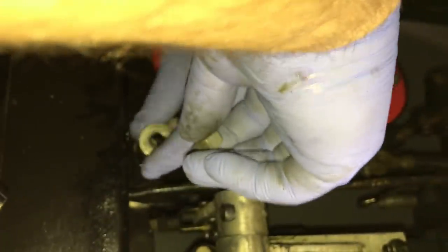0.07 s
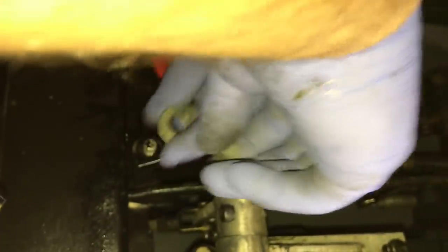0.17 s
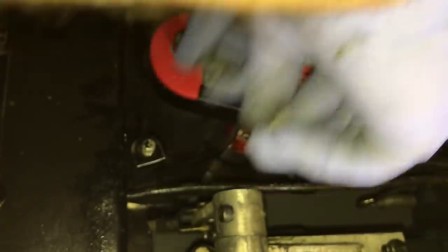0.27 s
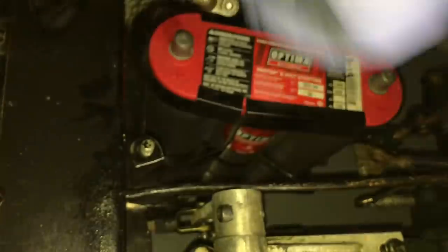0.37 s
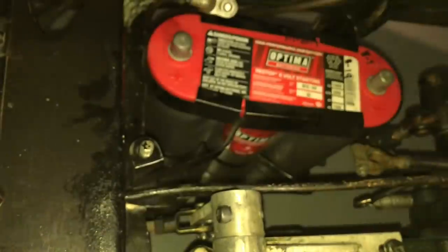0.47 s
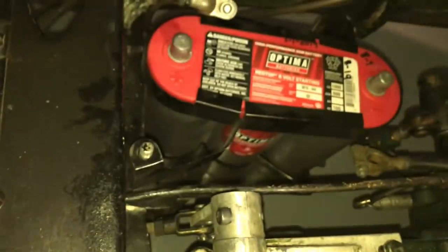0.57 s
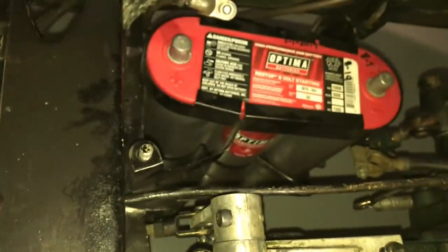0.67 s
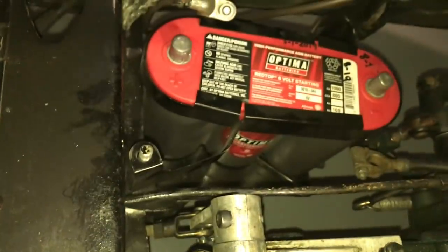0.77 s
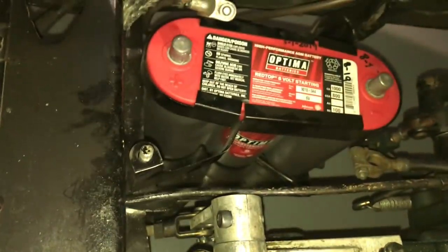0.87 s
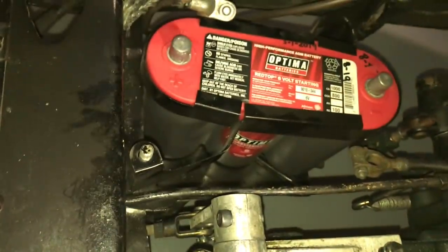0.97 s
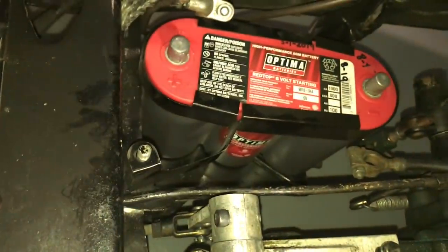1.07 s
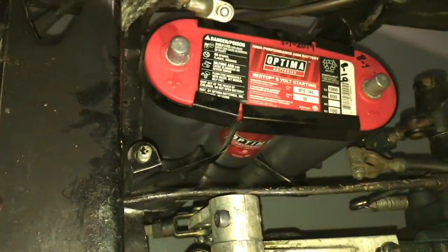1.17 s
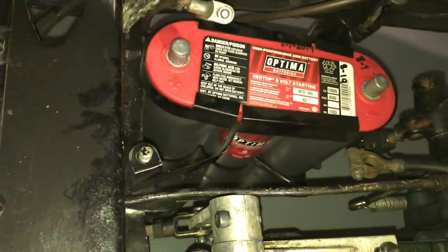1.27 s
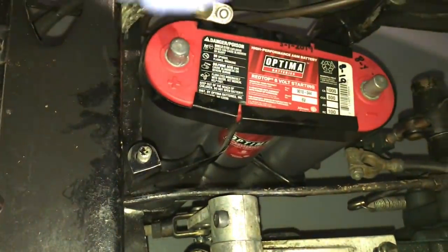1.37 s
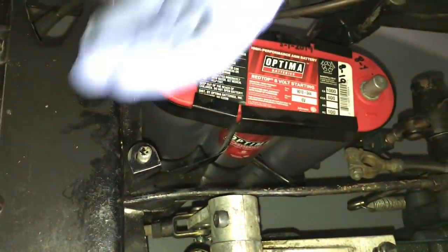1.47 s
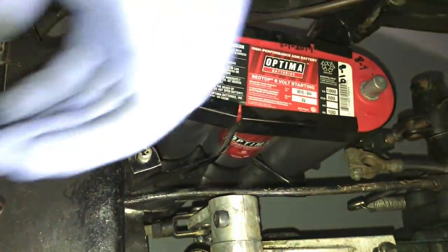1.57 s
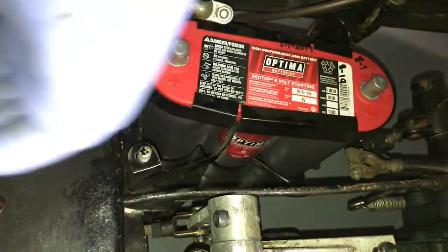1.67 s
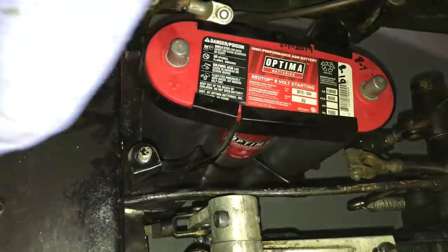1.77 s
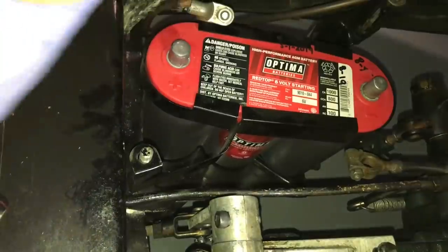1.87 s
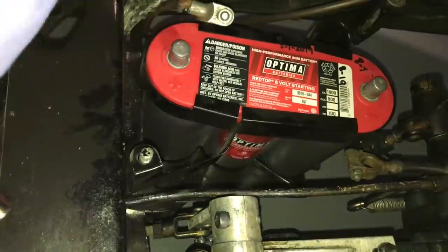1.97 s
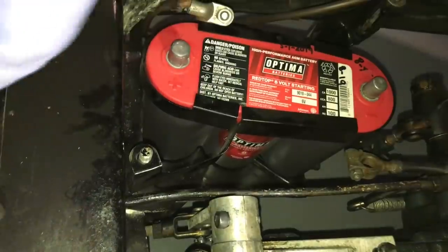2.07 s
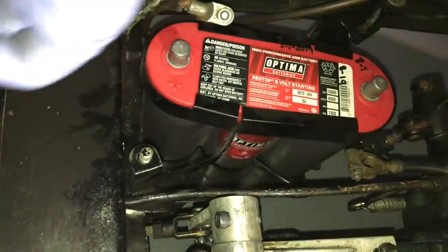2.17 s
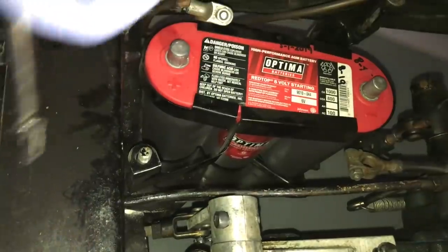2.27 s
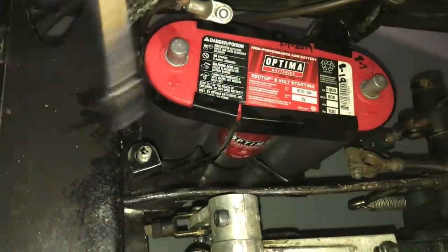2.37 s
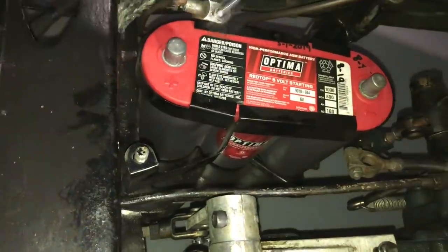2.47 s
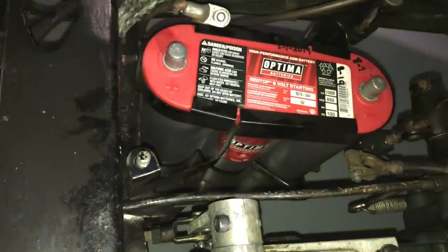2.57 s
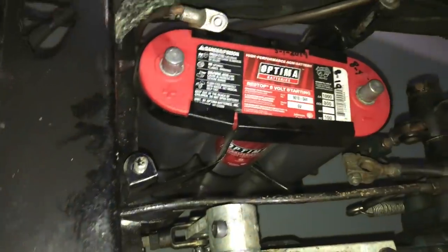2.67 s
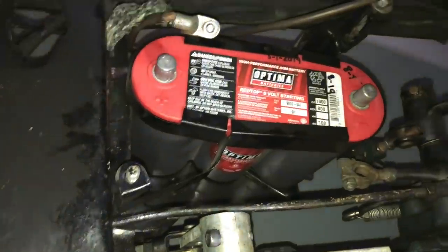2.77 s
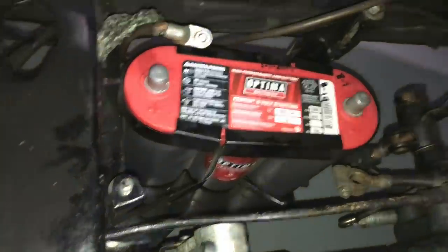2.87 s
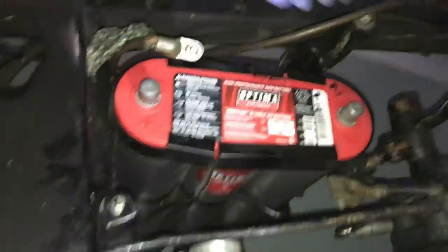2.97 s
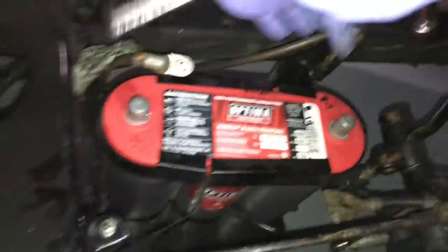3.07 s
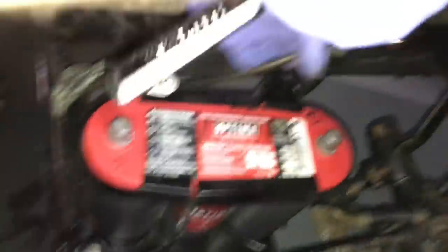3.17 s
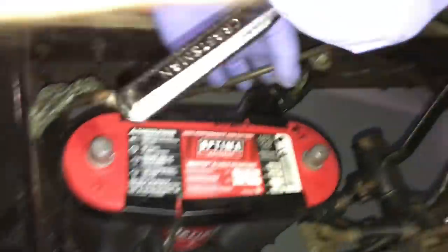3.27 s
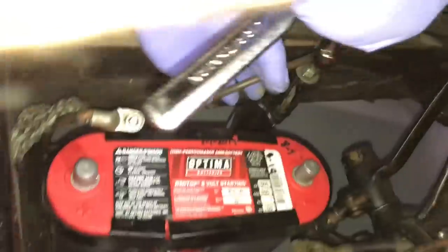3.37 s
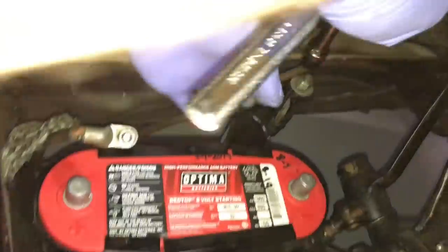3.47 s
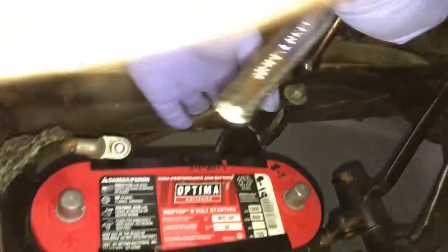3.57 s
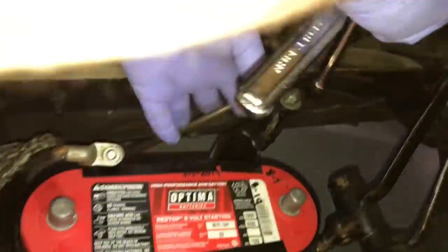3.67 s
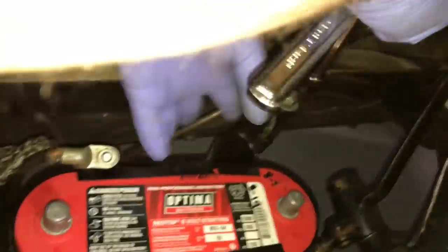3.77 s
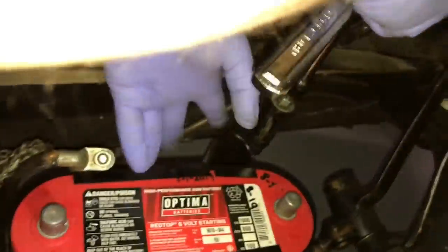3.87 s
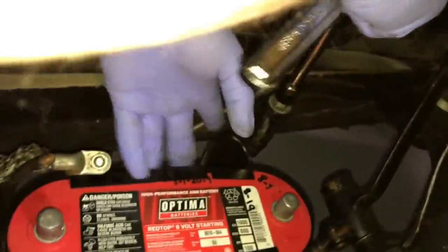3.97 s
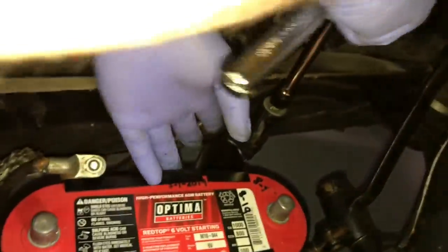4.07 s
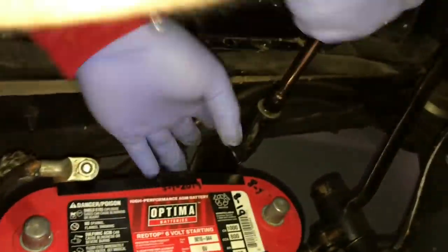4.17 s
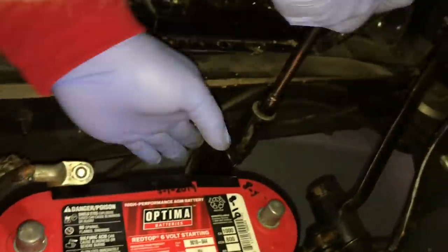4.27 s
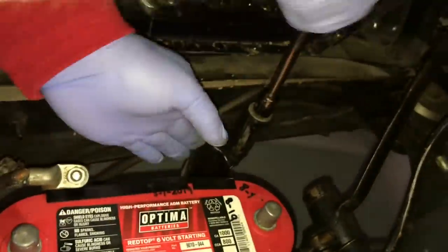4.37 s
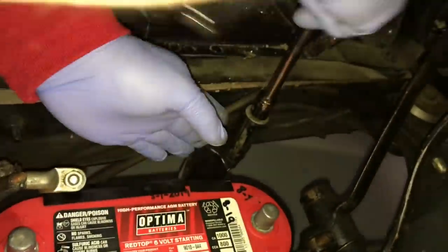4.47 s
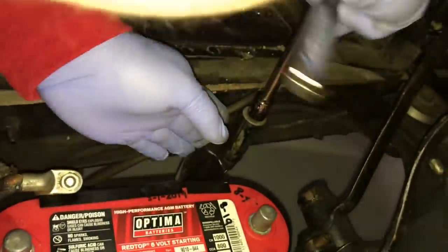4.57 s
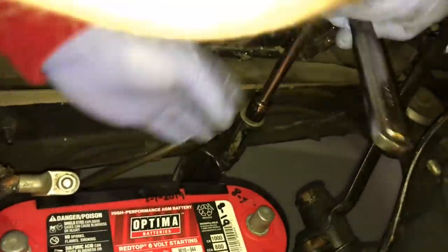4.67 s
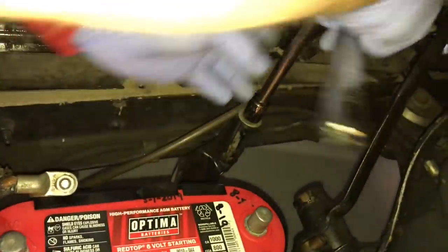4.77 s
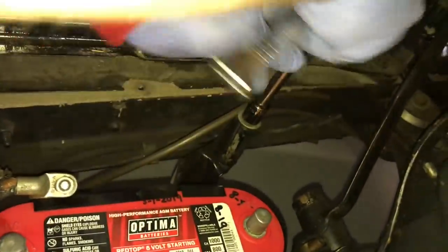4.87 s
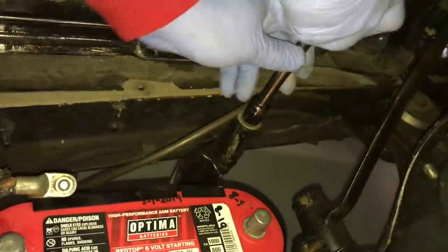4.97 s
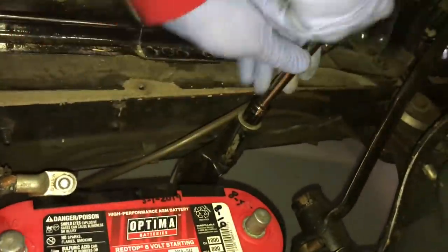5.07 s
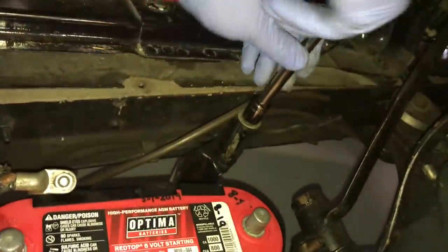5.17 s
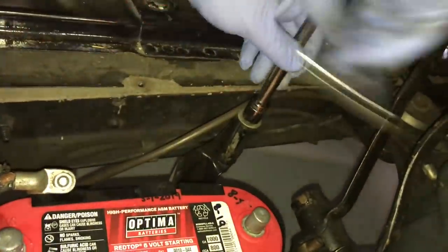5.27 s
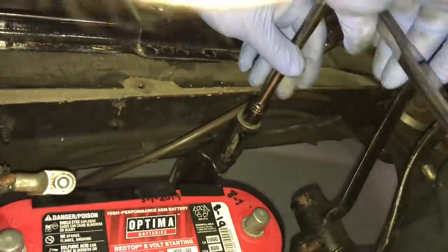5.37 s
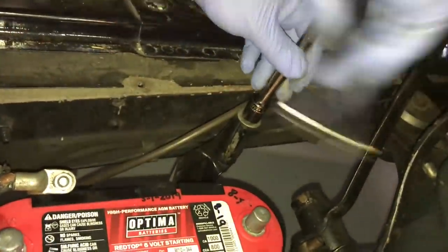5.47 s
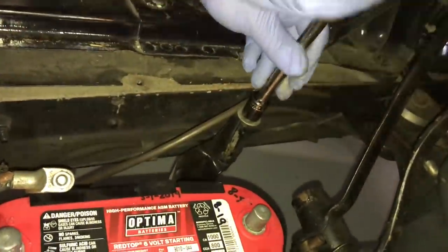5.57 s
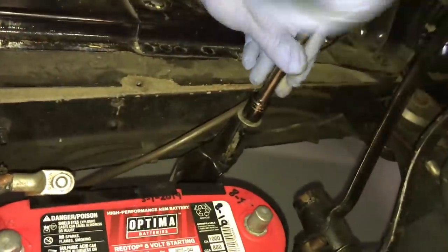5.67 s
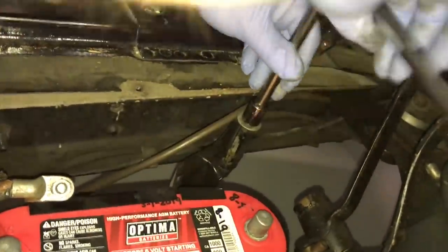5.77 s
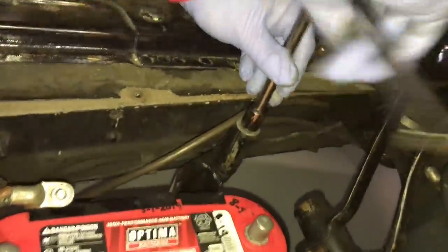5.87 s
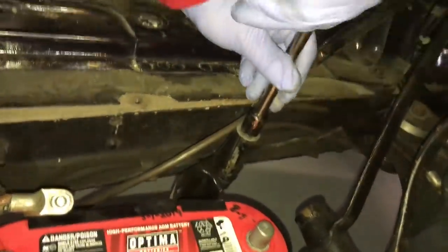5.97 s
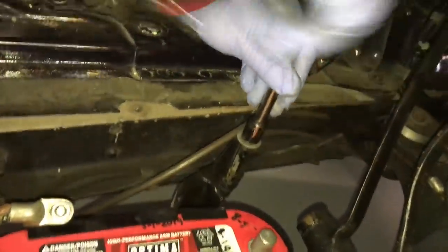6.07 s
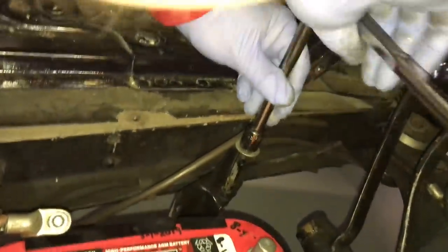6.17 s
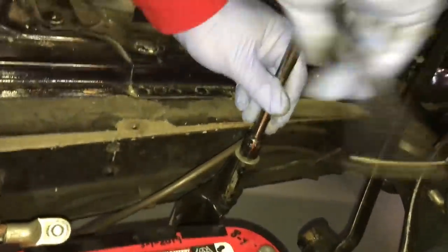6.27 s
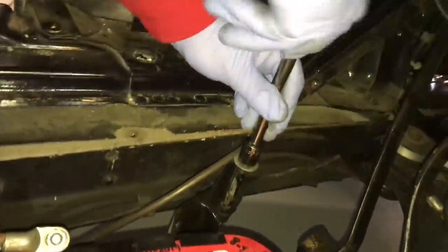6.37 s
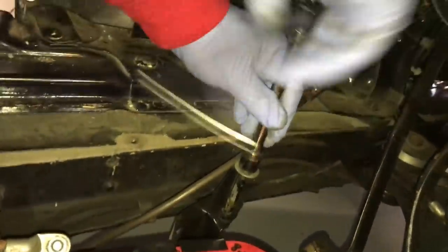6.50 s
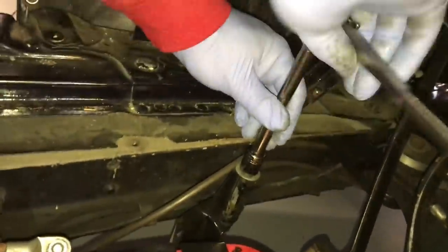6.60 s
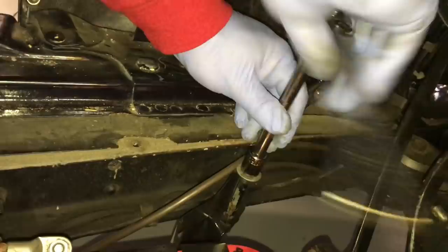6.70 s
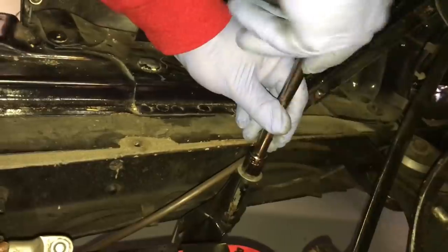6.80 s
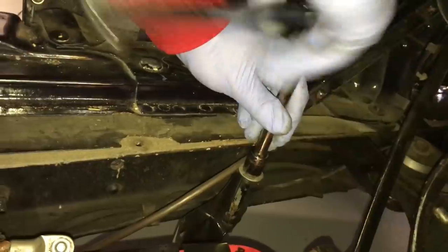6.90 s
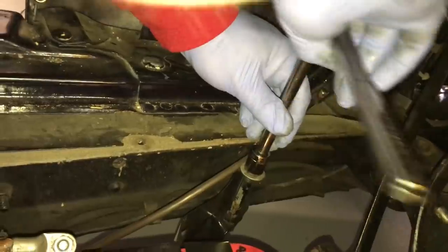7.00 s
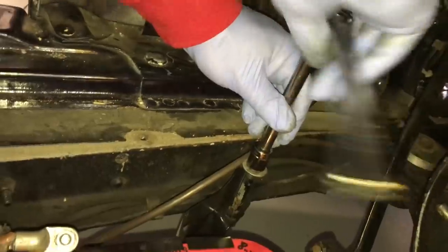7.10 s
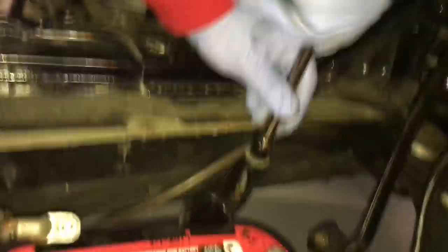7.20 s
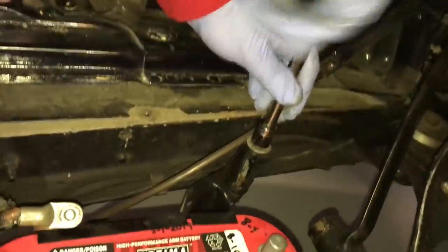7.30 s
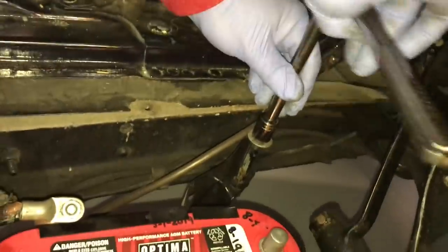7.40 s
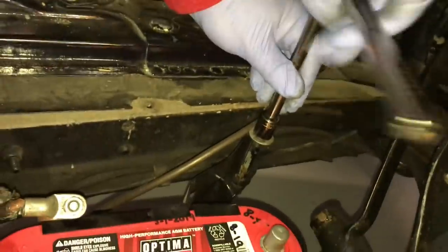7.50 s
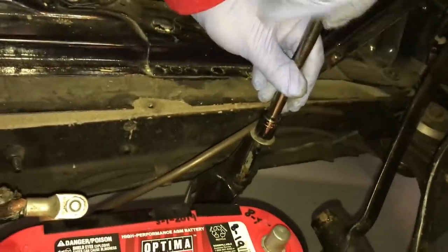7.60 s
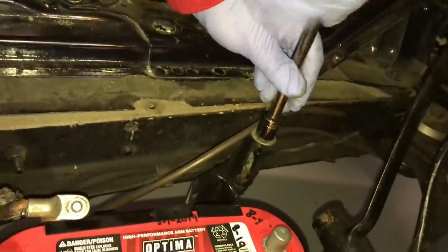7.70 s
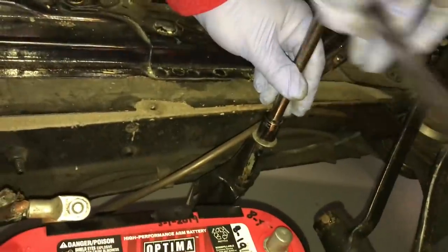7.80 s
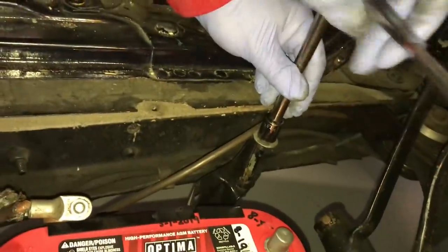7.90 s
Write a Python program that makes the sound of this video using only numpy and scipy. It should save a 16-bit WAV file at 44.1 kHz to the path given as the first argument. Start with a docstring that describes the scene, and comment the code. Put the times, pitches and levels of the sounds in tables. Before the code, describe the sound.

Close by in a quiet garage, a metal clamp rings briefly and a washer pings twice. A ratchet wrench slides over a vehicle's bodywork and hits it with one loud, ringing clank. Sleeves rustle softly, and the socket clinks and knocks as it is seated on a nut. After a few single sharp clicks, the ratchet works in quick, regular runs of bright ticks with dull knocks between them.

```python
"""A gloved mechanic works close by in a garage, sleeves rustling. First a clamp rings and a washer pings.
A ratchet wrench is picked up: it slides over the bodywork and clanks against it, exciting the sheet
metal's resonances. Its socket then knocks and rubs as it is seated on a nut. Last come quick strokes:
the pawl ticks over the teeth, slowing late in each back swing, and the socket knocks under the load."""
import sys
import numpy as np
from scipy import signal
from scipy.fft import rfft, irfft
from scipy.io import wavfile
from scipy.ndimage import uniform_filter1d, minimum_filter1d

SR = 44100
rng = np.random.default_rng(int(sys.argv[2]) if len(sys.argv) > 2 else 0)


def dump_mix(stems):
    """Bounce the given channels to the path in sys.argv[1] as a 16-bit WAV at rate SR."""
    frames = np.atleast_2d(stems).T  # one column per channel
    limited = np.clip(frames, -1, 1)  # hard clip at full scale
    pcm = np.round(limited * 32767).astype(np.int16)
    wavfile.write(sys.argv[1], SR, pcm)


N = 350154
TIME = np.arange(N) / SR

# Spectral envelopes of the struck parts: frequency_hz, relative_db
HEAD_SPECTRUM = [(200, -28), (600, -32), (1100, -10.5), (2600, -1.5), (3300, -3), (6500, 2.5), (8000, -1.5),
                 (11000, -6.5), (16000, -20)]
BRACKET_SPECTRUM = [(150, -12), (400, -6), (800, 1.5), (1300, 2.5), (2100, -5), (3500, -10.5), (8000, -27)]
WASHER_SPECTRUM = [(1000, -12), (7000, 1.5), (13500, -7), (16000, -37)]
BOOM_SPECTRUM = [(35, -14.5), (65, -1.5), (150, 3), (280, -14.5), (900, -42.5)]
# Resonances of wrench head, washer, hollow panel and nearby steel: centre_hz, width_hz, lift_db
HEAD_RESONANCES = [(3280, 70, 9), (3550, 60, 6.3), (4523, 150, 7.8), (6050, 200, 4.2)]
WASHER_RESONANCES = [(13500, 300, 36.7)]
PANEL_RESONANCES = [(150.7, 26, 6.5), (248.7, 37, 6.5), (328, 53, 6.5), (383, 54, 6), (554, 43, 7.5),
                    (724, 25, 7.5), (846, 21, 9.5)]
STEEL_RESONANCES = [(1080, 220, 9), (2300, 220, 6), (3520, 130, 8.5), (4080, 200, 7), (6050, 170, 4.5),
                    (7100, 120, 4.5)]
# Arm and hand shifting against the car: time_s, level_db
HAND_EFFORT = [(0.0, -62.5), (0.97, -69), (2.17, -55.5), (2.5, -70.5), (3.8, -54), (5.79, -47.5),
               (7.94, -48.5)]
# Back swings of the handle, with phase running from 0 to 1 between its turning points:
# first_tick_s, run_s, first_tick_phase, last_tick_phase, head_db
BACK_SWINGS = [(5.4344, 0.1281, 0.38, 0.98, -23.5), (5.8617, 0.0872, 0.37, 0.83, -24),
               (6.2555, 0.0925, 0.35, 0.86, -23.5), (6.6752, 0.1, 0.23, 0.79, -21),
               (7.1002, 0.0895, 0.54, 0.86, -22), (7.5088, 0.11, 0.68, 0.89, -24),
               (7.9126, 0.0246, 0.37, 0.5, -20)]


def from_db(db):
    """Amplitude grows tenfold with every 20 dB."""
    return 10 ** (np.asarray(db) / 20)


def at_hz(points, hz):
    """Interpolation on a logarithmic frequency axis."""
    table = np.array(points)
    return np.interp(np.log(np.maximum(hz, 1)), np.log(table[:, 0]), table[:, 1])


def level(curve):
    """An amplitude envelope, linear in decibels between (time_s, level_db) points."""
    return from_db(np.interp(TIME, *np.transpose(curve)))


def flicker(depth_db, per_s):
    """Random amplitude modulation."""
    return from_db(depth_db * np.interp(TIME * per_s, np.arange(N), rng.standard_normal(N)))


def spell(start_s, end_s, edge_s):
    """A trapezoidal envelope: it fades in, holds and fades out."""
    return np.clip(np.minimum(TIME - start_s, end_s - TIME) / edge_s + .5, 0, 1)


def noise():
    """White noise of unit power."""
    return rng.standard_normal(N)


def impacts(times, levels_db):
    """An ideally hard blow is an impulse; one falls at each time."""
    return np.bincount(np.round(times * SR).astype(int), from_db(levels_db), N)[:N]


def rattle(times, levels_db, rise_s, decay_s):
    """Each contact is a dense burst of tiny impacts; being incoherent, the bursts add in power."""
    t = TIME[:int(SR * 10 * (decay_s + rise_s))]
    shape = (1 - np.exp(-t / rise_s)) * np.exp(-t / decay_s)
    shape = shape / shape.max()
    power = np.zeros(N + len(t))
    for s, db in zip(times, levels_db):
        start = np.clip(round(s * SR), 0, N)
        power[start:start + len(t)] += (from_db(db) * shape) ** 2
    polarity = 2 * rng.integers(0, 2, N, dtype=np.int8) - 1
    return np.sqrt(power[:N]) * polarity


def ring(start_s, modes):
    """Free vibration: struck metal rings as a sum of exponentially damped modes."""
    t = TIME[:2 * SR]
    tone = sum(from_db(db - 60 * t / t60) * np.sin(2 * np.pi * hz * t) for hz, db, t60 in modes)
    return np.pad(tone, (round(start_s * SR), N))[:N]


def body(x, spectrum, peaks=(), size=8192):
    """Forced vibration: a body filters x by its envelope and resonances; white noise keeps its power."""
    hz = np.arange(size // 2 + 1) * SR / size
    lift = 1 + sum((from_db(db) ** 2 - 1) / (1 + (2 * (hz - f) / width) ** 2) for f, width, db in peaks)
    bass_rolloff = (hz + 1) / (hz + spectrum[0][0] / 2)
    gain = from_db(at_hz(spectrum, hz)) * np.sqrt(np.abs(lift)) * bass_rolloff
    cepstrum = irfft(np.log(gain))
    cepstrum[1:size // 2] *= 2   # minimum phase: nothing sounds before its cause
    cepstrum[size // 2 + 1:] = 0
    response = irfft(np.exp(rfft(cepstrum)))
    return signal.oaconvolve(x, response / np.linalg.norm(response))[:N]


def varied(peaks, vary_db=3.5, detune=0.007):
    """The striking point decides which resonances are favoured, and shifts them a little."""
    return [(hz * (1 + rng.normal(0, detune)), width, max(db + rng.normal(0, vary_db), 0))
            for hz, width, db in peaks]


def still_air(level_db=-60.0):
    """The ambient noise floor: steady and strongest in the bass."""
    air_spectrum = [(25, -9.5), (75, 7), (150, -3.5), (200, -29.5), (400, -12.5), (1000, -14.5),
                    (6000, -42), (16000, -53.5)]   # frequency_hz, relative_db
    return from_db(level_db) * body(noise(), air_spectrum)


def clothing():
    """Friction of cloth gives broadband noise: sleeves rustle and a glove brushes past."""
    rustling = [(0.0, -65), (0.7, -59), (1.4, -70), (2.12, -59.5), (2.4, -63), (3.15, -64), (3.7, -55),
                (3.85, -62), (4.3, -68), (4.9, -46.5), (5.15, -61), (7.94, -61)]   # time_s, level_db
    cloth_spectrum = [(400, 4.5), (1000, 1), (6000, -2.5), (10500, -8), (16000, -12)]   # frequency_hz, relative_db
    swishes = [(2.719, 0.098, -50.5), (3.035, 0.047, -48.5), (3.137, 0.078, -51), (3.968, 0.052, -44.5),
               (7.455, 0.055, -49)]   # middle_s, length_s, level_db
    sleeve = body(level(rustling) * flicker(depth_db=3.0, per_s=190) * noise(), cloth_spectrum)
    brushing = sum(from_db(db) * np.exp(-(2 * (TIME - s) / length) ** 2) for s, length, db in swishes)
    glove = body(brushing * noise(), [(1500, 12.5), (8000, 5.7), (16000, 4.5)])
    return sleeve + glove


def arm_on_car(rumble_db=-0.5):
    """Soft contact excites mostly low frequencies: an arm shifts, drags and bumps on the car."""
    rumble_spectrum = [(30, -1), (70, 7), (330, 6), (480, -13.5), (1100, -8.5), (2500, -25.5), (6000, -27)]   # frequency_hz, relative_db
    dragging = [(3.05, -88.5), (3.22, -47.5), (3.36, -65), (3.52, -46.5), (3.7, -60.5), (3.8, -91)]   # time_s, level_db
    soft_blows = [(3.549, -36.5), (4.614, -37.5)]   # start_s, level_db
    shifting = level(HAND_EFFORT) * flicker(depth_db=5.5, per_s=16) * noise()
    rumble = body(shifting, rumble_spectrum, PANEL_RESONANCES)
    forearm = body(level(dragging) * noise(), [(400, 1.5), (2600, -7), (8000, -22.0)])
    bumps = body(rattle(*np.transpose(soft_blows), rise_s=0.003, decay_s=0.011), BOOM_SPECTRUM)
    return from_db(rumble_db) * rumble + forearm + bumps


def garage(x, near_db=-14.0, near_t60_s=0.19, far_db=-23.0, edge_count=10):
    """Reverberation: early reflections off the car, then a steely tail whose top band dies first."""
    decay_times = [(100, 0.89), (1000, 0.28), (4000, 0.6), (8000, 1), (14000, .16)]   # frequency_hz, t60_s
    t, tail = TIME[:SR], 0
    edges = np.geomspace(50, 17000, edge_count)
    for low, high in zip(edges, edges[1:]):
        bandpass = signal.butter(2, [low, high], "band", fs=SR, output="sos")
        band = signal.sosfilt(bandpass, rng.standard_normal(SR))
        tail = tail + band * from_db(-60 * t / at_hz(decay_times, np.sqrt(low * high)))
    early = rng.standard_normal(SR) * from_db(-60 * t / near_t60_s)
    near = body(early * (t > .003), [(100, 6.5), (4500, -11), (16000, -24.5)])[:SR]
    far = body(tail * (t > .008), [(100, 12.0), (6000, -18.5), (9000, -18.5)], STEEL_RESONANCES)[:SR]
    echoes = from_db(near_db) * near / np.linalg.norm(near) + from_db(far_db) * far / np.linalg.norm(far)
    return signal.oaconvolve(x, echoes)[:N]


def fidgets(tap_db=-52, tick_db=-64.0, scatter_db=1.5, count=36):
    """Light random impacts of fingers and loose parts, firmer as the hands work harder."""
    s = np.sort(rng.uniform(0, N / SR, count))
    effort = np.interp(s, *np.transpose(HAND_EFFORT))
    tap, tick = effort - effort.mean() - scatter_db * rng.standard_normal((2, count))
    taps = rattle(s, tap + tap_db, rise_s=0.0019, decay_s=0.0032)
    ticks = rattle(s, tick + tick_db, rise_s=0.00018, decay_s=0.0011)
    return body(taps, BRACKET_SPECTRUM) + body(ticks, HEAD_SPECTRUM, HEAD_RESONANCES)


def hardware(touch_db=-32.5):
    """Contact noise, then free vibration: a clamp is let go and rings, and a washer pings."""
    pings = [(0.7351, -28), (0.8236, -21), (1.509, -45), (1.63, -46), (1.666, -51)]   # start_s, level_db
    # Natural modes: pitch_hz, level_db, t60_s
    clamp_modes = [(450, -41.5, 0.16), (694, -47, 0.3), (2389, -39, 0.24), (6180, -34, 0.087)]
    washer_modes = [(4400, -42, 0.8), (12280, -25, 0.12), (13300, -14, 0.16)]
    contacts = rattle(*np.transpose(pings), rise_s=0.00018, decay_s=0.0067)
    washer_ticks = body(contacts, WASHER_SPECTRUM, WASHER_RESONANCES)
    washer_ring = sum(from_db(db) * ring(s, washer_modes) for s, db in pings)
    clamp_touch = body(rattle([0], [touch_db], rise_s=0.00061, decay_s=0.016), BRACKET_SPECTRUM)
    return washer_ticks + washer_ring + clamp_touch + ring(0, clamp_modes)


def rubbing(edge_s=.08):
    """Slow friction makes steel sing faintly; two parts in series sharpen the resonances."""
    rubs = [(1.699, 1.984, -64.5), (3.868, 3.936, -61), (4.37, 5.157, -64), (4.8, 5.1, -57.5),
            (5.627, 5.808, -65), (6.4, 7.94, -62)]   # tool drawn out, socket seated, nut turning: start_s, end_s, level_db
    pressure = sum(from_db(db) * spell(start, end, edge_s) for start, end, db in rubs)
    friction_spectrum = [(600, -8.0), (1100, 1.5), (6000, -3.5), (8000, -22.5)]
    first_part = body(pressure * noise(), friction_spectrum, STEEL_RESONANCES)
    return body(first_part, [(100, 0)], STEEL_RESONANCES)


def gear_drag(drag_db=-13.5, lead_s=0.045, swing_s=0.19):
    """Sliding friction in the gear swells and fades with the speed of each back swing."""
    gear_spectrum = [(400, 1.5), (1100, 8), (1900, 0.5), (2600, 4.5), (12000, -13.5)]   # frequency_hz, relative_db
    drag = 0
    for start, *_, head_db in BACK_SWINGS:
        progress = np.clip((TIME - start + lead_s) / swing_s, 0, 1)
        drag = drag + from_db(head_db + drag_db) * np.sin(np.pi * progress)
    return body(drag * flicker(depth_db=3.5, per_s=420) * noise(), gear_spectrum, [(1890, 85, 14.3)])


def wrench_pick_up(glint_db=-4, crash_db=-1.5):
    """Friction, then impact: the wrench slides on sheet metal, strikes and bounces; its handle rings."""
    sliding = [(1.92, -78.5), (1.935, -45), (2.005, -49), (2.022, -31), (2.06, -28), (2.075, -98)]   # time_s, level_db
    clanks = [(2.0619, -3.5), (2.0616, -16), (2.069, -6.5), (2.0795, -28.5)]   # start_s, level_db
    # Sheet metal, rubbed and struck: frequency_hz, relative_db
    slide_spectrum = [(100, -20.5), (300, -5), (700, -4), (1100, -11), (2000, -17.5), (14000, -42.5)]
    sheet_spectrum = [(70, -36), (150, -8.5), (550, -5.5), (1000, 0.5), (2000, -7.5), (3700, 6.5),
                      (4700, -8.5), (8500, -11.5), (10300, -19), (13500, -9), (16000, -37)]
    sheet_resonances = [(520, 40, 14), (710, 60, 12), (850, 30, 7.5), (2460, 120, 4.3), (5570, 170, 13)]   # centre_hz, width_hz, lift_db
    handle_modes = [(5140, -62.5, 1.44)]   # pitch_hz, level_db, t60_s
    s, db = np.transpose(clanks)
    catching = flicker(depth_db=2.5, per_s=200)
    slide = body(level(sliding) * catching * noise(), slide_spectrum, [(680, 75, 6.1), (1850, 200, 8)])
    blows = rattle(s, db + crash_db, rise_s=0.000083, decay_s=0.0088)
    crash = body(blows, sheet_spectrum, sheet_resonances)
    first_touch = rattle([s[1]], [glint_db], rise_s=0.000227, decay_s=.002)
    glint = body(first_touch, WASHER_SPECTRUM, WASHER_RESONANCES)
    return slide + crash + glint + ring(s[0], handle_modes)


def knocks(thud_db=-2.5, boom_db=-13.0, clack_db=0.5, slack_s=0.0388, colours=3):
    """Structure-borne sound: the socket clinks, the bracket clacks, the panel thuds and then booms."""
    # Tool handled, seated and loaded: start_s, thud_db, clack_db, clink_db
    work_knocks = [(1.077, -73, -56, -78), (1.496, -46, -60.5, -83), (1.629, -41.5, -38, -71.5),
                   (1.928, -44.5, -48, -47.5), (1.967, -42, -45, -44.5), (2.068, -51, -28, -46),
                   (2.527, -78, -75, -49.5), (3.269, -46.5, -42.5, -71), (3.76, -70, -39.5, -51),
                   (3.777, -37, -44, -19), (3.781, -60, -54, -21.5), (3.8604, -34, -43, -35),
                   (3.878, -40, -57, -33), (3.929, -35, -69, -33.5), (4.004, -31, -55, -28.5),
                   (4.013, -50, -39, -32), (4.073, -32, -39, -26.5), (4.094, -28, -37, -29.5),
                   (4.156, -31.5, -63, -35.5), (4.338, -43.5, -42, -52), (4.697, -40, -43, -69),
                   (4.757, -38.5, -40.5, -30.5), (4.956, -41, -42, -57), (5.136, -40, -34.5, -38),
                   (5.601, -39, -36.5, -34), (6.014, -31.5, -30.5, -33), (6.38, -32.5, -38.5, -34.5),
                   (6.41, -43, -31.5, -39), (6.82, -36.5, -28.5, -38), (7.066, -69, -54, -30),
                   (7.2374, -34.5, -31, -42), (7.66, -36, -35, -29.5)]
    # Spectral envelopes: frequency_hz, relative_db
    panel_spectrum = [(60, -28.5), (150, -4.5), (260, 0.5), (370, -1.5), (450, -11.5), (800, -14),
                      (2000, -73)]
    socket_spectrum = [(500, -8.5), (1500, -15), (1850, -1), (4600, -1.5), (6500, -9), (10000, -15),
                       (16000, -44.5)]
    # Resonances: centre_hz, width_hz, lift_db
    bracket_resonances = [(1194, 37, 3.7)]
    socket_resonances = [(1850, 50, 11), (2480, 70, 8.4), (3420, 99, 4.3), (4210, 120, 7), (4900, 80, 4.2),
                         (5920, 63, 13), (7080, 24, 13)]
    # The handle turns back and frees the socket slack_s before each swing's first tick.
    releases = [(start - slack_s, -46.5, -46.0, -40.0) for start, *_ in BACK_SWINGS]
    s, thud, clack, clink = np.transpose(work_knocks + releases)
    bounce = flicker(depth_db=1.5, per_s=500)   # loose parts touch again and again
    thuds = rattle(s, thud + thud_db, rise_s=0.0024, decay_s=0.047)
    panel = body(thuds, panel_spectrum, PANEL_RESONANCES)
    boom = body(rattle(s + 0.026, thud + boom_db, rise_s=0.017, decay_s=0.015), BOOM_SPECTRUM)
    clacks = bounce * rattle(s, clack + clack_db, rise_s=0.0018, decay_s=0.017)
    bracket = body(clacks, BRACKET_SPECTRUM, bracket_resonances)
    socket = 0
    for k in range(colours):
        clinks = bounce * rattle(s[k::colours], clink[k::colours], rise_s=0.0016, decay_s=0.0075)
        socket = socket + body(clinks, socket_spectrum, varied(socket_resonances))
    return panel + boom + bracket + socket


def swing_ticks(head_fade_db=3.5, head_share=0.35):
    """Harmonic motion past evenly spaced teeth: the ticks spread out as the handle slows."""
    tooth_drops = [(-18, -16, -18.5, -21, -21, -23, -24.5, -29), (-19, -22, -17.5, -28, -27, -16.5, -24),
                   (-17, -23, -25, -22, -25, -27.5, -26, -23.5),
                   (-24, -23, -25, -24, -23, -17.5, -21, -21, -30, -28),
                   (-21, -18.5, -20, -21, -22, -24, -25.5), (-19, -21, -24, -27, -30, -24.5, -21.5),
                   (-21, -18.5, -19.5)]   # one row a swing: pawl_db for each tooth
    ticks = []
    for (start, run, first, last, head_db), pawl_db in zip(BACK_SWINGS, tooth_drops):
        tooth_positions = np.linspace(np.cos(np.pi * first), np.cos(np.pi * last), len(pawl_db))
        phase = np.arccos(tooth_positions)
        progress = (phase - phase[0]) / (phase[-1] - phase[0])
        settling_db = head_db - head_fade_db * progress ** 2
        extra_force_db = np.array(pawl_db) - np.mean(pawl_db)
        ticks += zip(start + run * progress, settling_db + head_share * extra_force_db, pawl_db)
    return np.array(ticks)


def ratchet(snap_db=1.5, chatter_db=1.0, shake_db=1.0,
            land_s=0.00066, land_pawl_db=14.0, land_head_db=13, colours=5):
    """Impact excitation: the pawl snaps onto each tooth, lands, chatters and sets the head ringing."""
    # The pawl slips one tooth, or locks as the handle turns round: start_s, head_db, pawl_db
    lone_ticks = [(4.015, -22, -50), (4.118, -20.5, -26), (4.1563, -32, -31), (4.7998, -22, -34),
                  (4.8495, -18.5, -21), (4.8825, -19, -21), (4.932, -25, -20.5), (4.9801, -23.5, -23),
                  (5.409, -37, -37), (5.4288, -37, -24), (5.8455, -34, -55), (6.009, -34, -37),
                  (6.2305, -34, -40), (6.414, -32.5, -35), (6.6533, -32.5, -33.5), (6.8215, -31.5, -42),
                  (7.2388, -31.5, -31), (7.6558, -29, -31.5)]
    pawl_spectrum = [(3000, -32), (7000, -18), (8200, -6.5), (11800, 1.5), (14000, 1.5), (15400, 4),
                     (16500, -36)]   # frequency_hz, relative_db
    pawl_resonances = [(8980, 170, 18), (9840, 140, 12.4), (11130, 200, 6.2), (13300, 200, 12.6),
                       (14800, 260, 7.2), (15200, 220, 4.4)]   # centre_hz, width_hz, lift_db
    ticks = np.vstack([lone_ticks, swing_ticks()])
    out = 0
    for k in range(colours):   # successive teeth differ in timbre
        s, head, pawl = ticks[k::colours].T
        snap = rattle(s, pawl + snap_db, rise_s=0.0004, decay_s=0.001)
        chatter = rattle(s, pawl + chatter_db, rise_s=0.0004, decay_s=0.0036)
        shake = rattle(s, head + shake_db, rise_s=0.0004, decay_s=0.0048)
        landing = impacts(s + land_s, pawl + land_pawl_db)
        jolt = impacts(s + land_s, head + land_head_db)
        out = out + body(snap + landing + chatter, pawl_spectrum, varied(pawl_resonances))
        out = out + body(jolt + shake, HEAD_SPECTRUM, varied(HEAD_RESONANCES))
    return out


def scene(clank_room_db=-2.5):
    """Superposition of the direct work sounds, their reverberation and the background."""
    work = ratchet() + gear_drag() + rubbing() + knocks() + fidgets() + hardware()
    clank = wrench_pick_up()
    reverberation = garage(work + from_db(clank_room_db) * clank)
    background = clothing() + arm_on_car() + still_air()
    return (work + clank + reverberation + background)[None]


def record(dry, ceiling=.9, cutoff_hz=16100):
    """Fast limiting holds down the loudest peaks; a steep low-pass filter cuts the top."""
    allowed = ceiling / np.maximum(np.abs(dry), ceiling)
    gain = uniform_filter1d(minimum_filter1d(allowed, size=90), size=60)
    lowpass = signal.ellip(10, .2, 80, cutoff_hz, fs=SR, output="sos")
    return signal.sosfilt(lowpass, gain * dry)


dry = scene()
out = record(dry)
dump_mix(out)
```